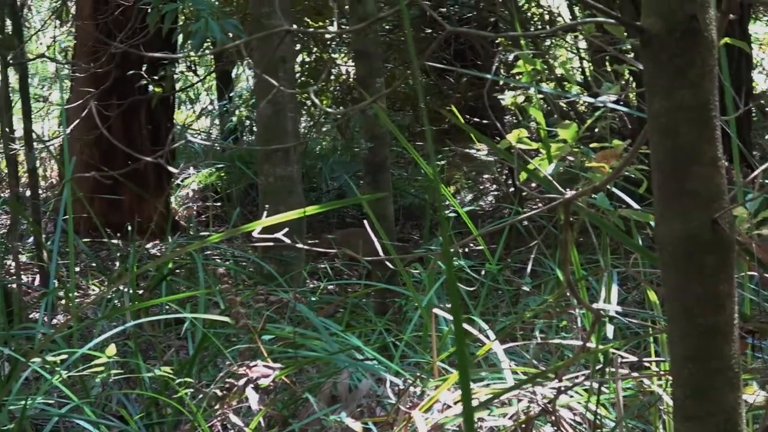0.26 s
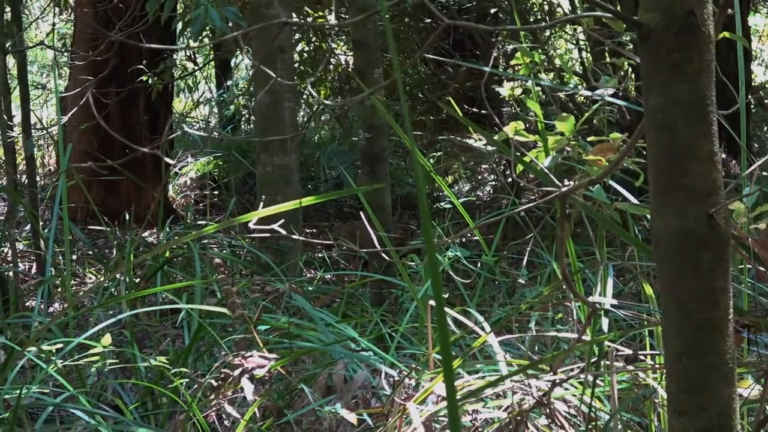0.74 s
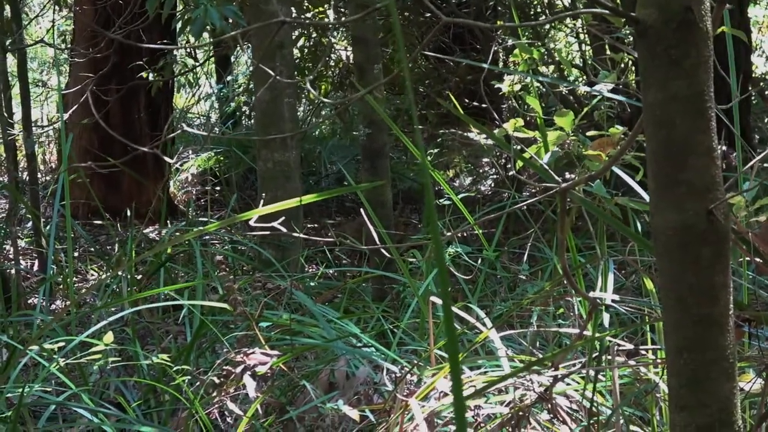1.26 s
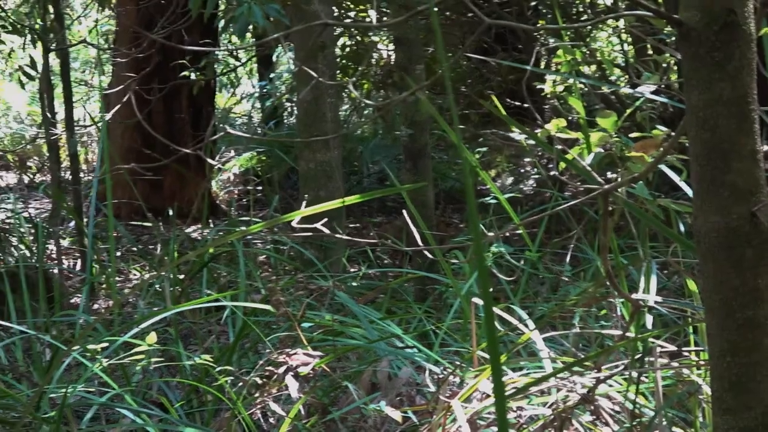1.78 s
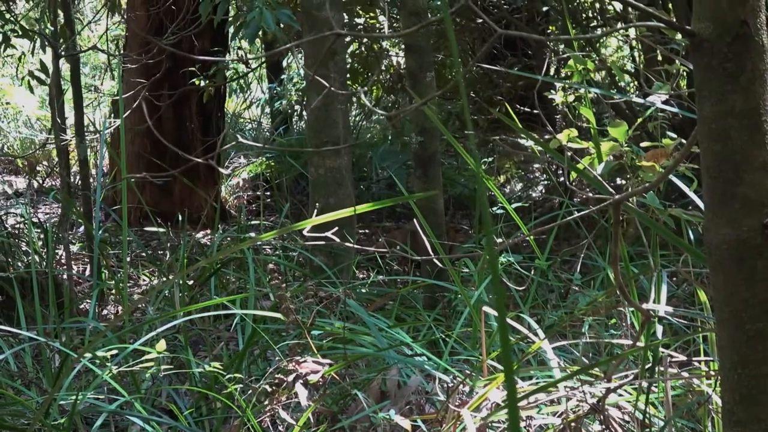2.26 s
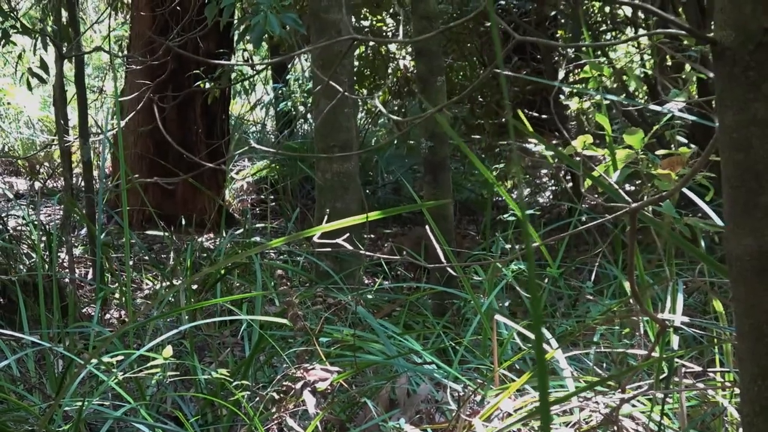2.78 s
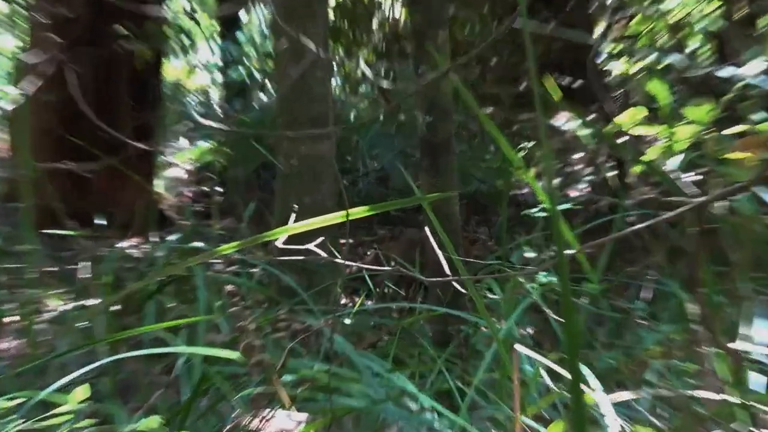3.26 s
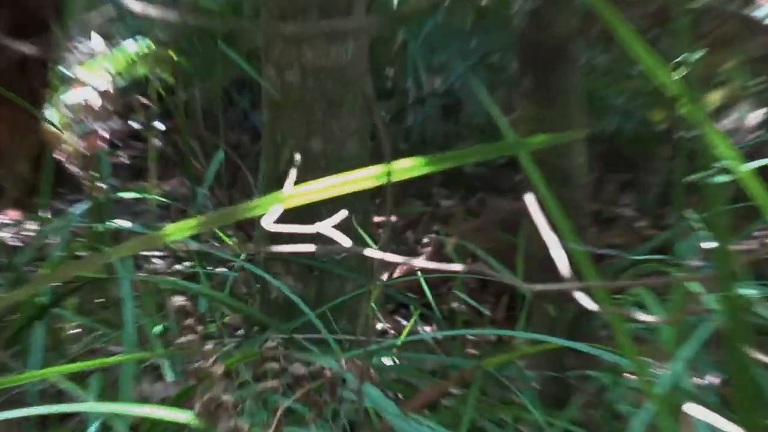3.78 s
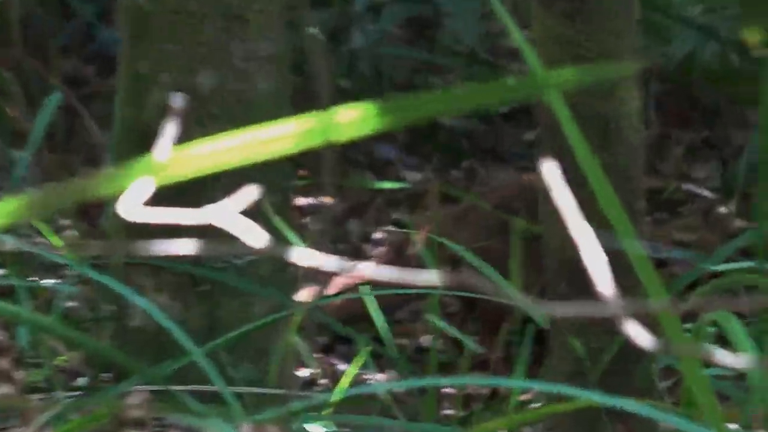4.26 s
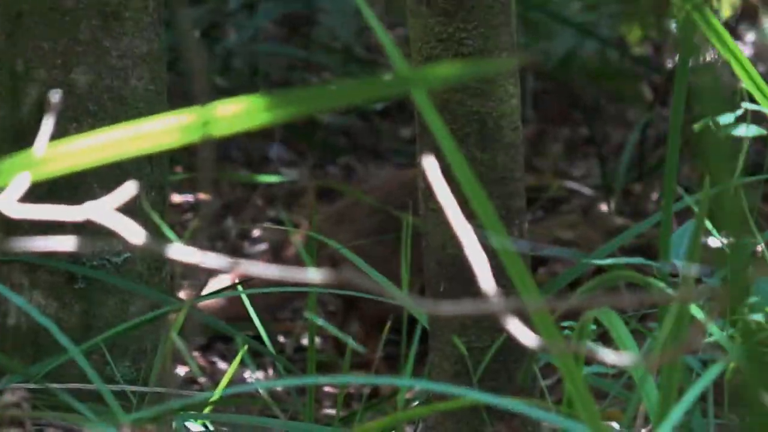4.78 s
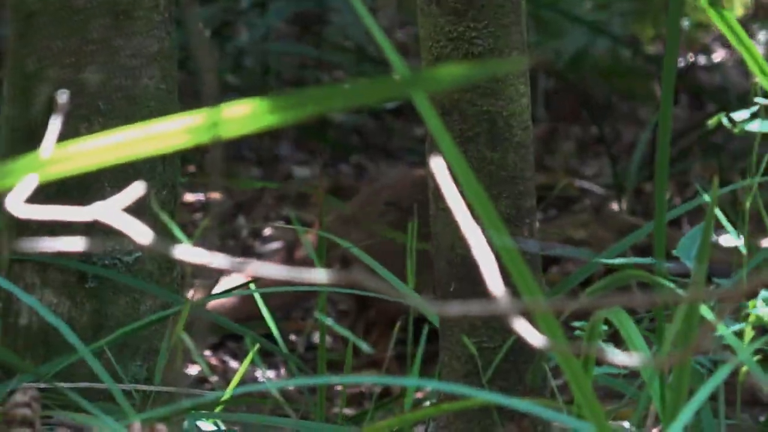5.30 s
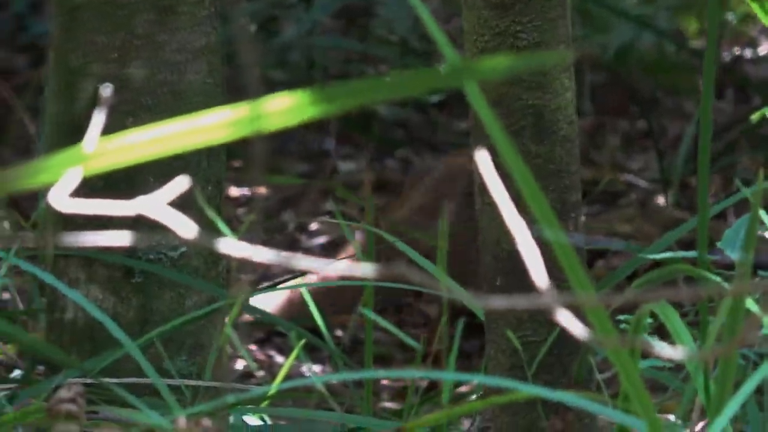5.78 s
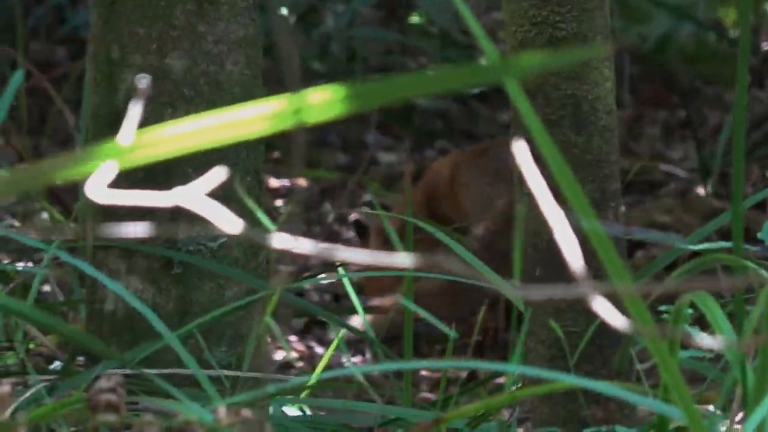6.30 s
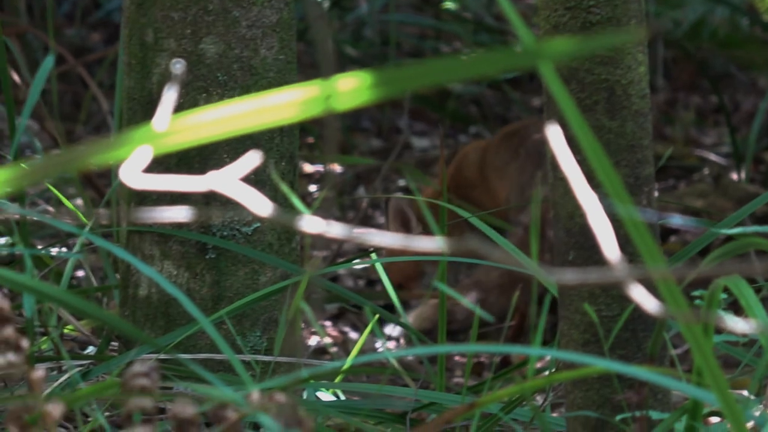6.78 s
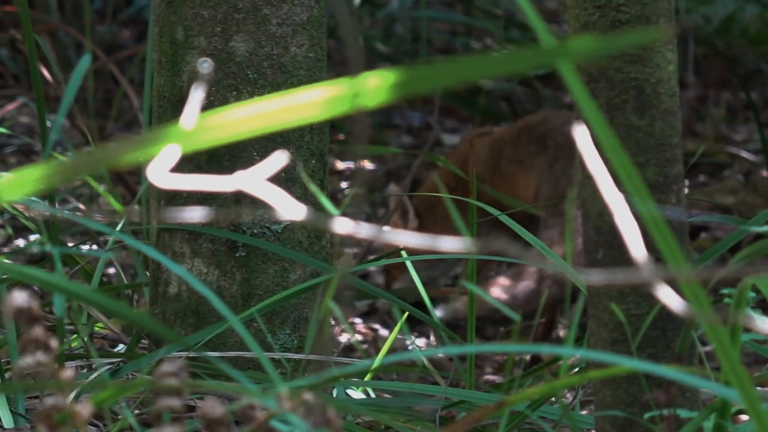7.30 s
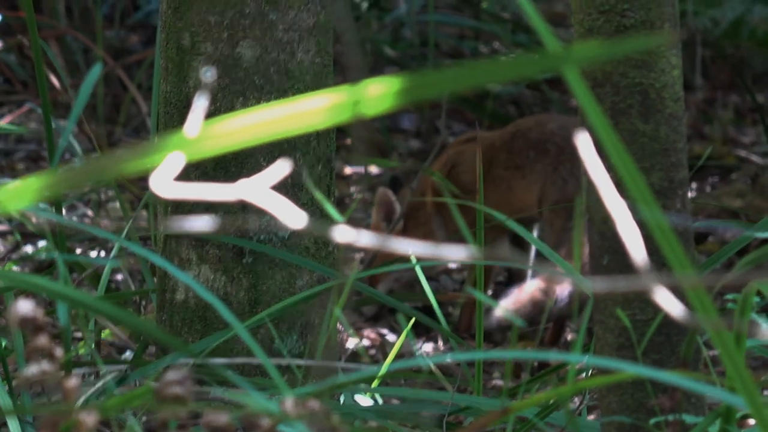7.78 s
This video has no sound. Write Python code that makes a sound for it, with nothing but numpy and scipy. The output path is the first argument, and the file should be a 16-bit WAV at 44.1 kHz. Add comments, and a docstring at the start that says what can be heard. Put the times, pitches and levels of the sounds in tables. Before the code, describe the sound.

Outdoors in dense woodland, a bird close on the right sings piercing, pure pips that grow louder, drops into a quick falling whistle and snaps upward in a whip-like crack. Distant birds ring and chatter in the gap, then the whole song returns. Soft leaf rustle, faint throbbing insects and a low hum lie beneath. Wide stereo pickup, with echoes scattering among the trunks.

```python
"""Whipbird in dense bush

A whipbird close by on the right sings twice: a swelling row of pips, a falling whistle, a rising crack.
Its notes are near-sine tones with faint overtones; sums of noise tails scatter them as trunks and leaves do.
Far birds ring, chatter and call hoarsely and faint high insect bands glide, from the same tone and scatter.
A low hum, drones, a throbbing high insect, rustling leaves, a twig and a faint rumble are all shaped noise."""
import sys
import numpy as np
from scipy import signal
from scipy.fft import rfft, irfft, next_fast_len
from scipy.io import wavfile
from scipy.ndimage import uniform_filter1d

SR = 44100
rng = np.random.default_rng(int(sys.argv[2]) if len(sys.argv) > 2 else 0)


def wav_record(signal):
    """Record a signal, one row per channel, as 16-bit PCM in the file named by sys.argv[1]."""
    frames = np.transpose(np.atleast_2d(signal))
    bounded = np.clip(frames, -1, 1)
    # unit amplitude maps onto the largest positive 16-bit level
    quanta = np.round(bounded * 32767).astype(np.int16)
    wavfile.write(sys.argv[1], SR, quanta)


def ratio(d):
    """dB to gain"""
    e = np.asarray(d, float) / 20
    return 10 ** e


N = 355005
T = np.arange(N) / SR
SIZE = next_fast_len(N + 2 * SR)
HZ = np.arange(SIZE // 2 + 1) * SR / SIZE + 1e-3  # offset avoids division by zero

# Bush background. Each row: frequency in Hz, level in dB per Hz, left minus right in dB, side share.
AIR_SPECTRUM = [(19.9, -88.5, 5.5, .05), (44.26, -76.5, 0, 0.0597), (113.5, -82.5, -1.5, .2),
                (182, -87.5, -1.5, .35), (400, -85.5, 5, 0.24), (1060, -88, 5.5, 0.14),
                (1490, -99, -7, 0.39), (3250, -104, -1, 0.24), (4990, -108.5, -1.5, 0.27),
                (8700, -109, 0, 0.74), (15600, -112, -0.5, 0.55)]
# Low hum and drones. Each row: centre in Hz, width in Hz, mid level in dB, left minus right in dB, side share.
HUM_AND_DRONES = [(72.3, 29, -56.5, -1, 0.062), (657, 298, -56, -0.5, 0.18),
                  (1169.6, 106, -57.5, -15, 0.18)]
# High insect throbs. Each row: middle in seconds, level above the floor's own share in dB.
INSECT_THROBS = [(.15, -73), (.38, -74.5), (.56, -74.5), (.72, -72), (1.0, -72), (1.3, -70.5), (1.62, -71),
                 (1.85, -74), (2.09, -74.5), (2.39, -69.5), (2.61, -71), (2.84, -72), (3.06, -71.5),
                 (3.33, -71.5), (3.54, -70), (3.76, -76.5), (3.91, -69), (4.17, -67), (4.39, -71),
                 (4.62, -71), (4.85, -74), (5.02, -73), (5.22, -72), (5.49, -69), (5.72, -71), (5.97, -70),
                 (6.27, -66.5), (6.6, -66.5), (7.05, -65.5), (7.42, -70), (7.68, -70), (7.9, -70)]
# Breeze in the canopy. Each row: time in seconds, mean level in dB.
BREEZE_LEVELS = [(0, -62), (.5, -69.5), (1.0, -60.5), (2.0, -63.5), (2.6, -67.5), (3.2, -71.5), (4.4, -73),
                 (5.0, -68.5), (6.0, -69), (6.7, -62), (7.4, -65), (8.05, -64)]
# Leaf rustles. Each row: middle in seconds, level in dB ahead of the band gains.
LEAF_RUSTLES = [(.16, -60), (.33, -67), (.41, -55), (.56, -55), (.70, -55), (.94, -60.5), (1.75, -58),
                (1.89, -57.5), (2.0, -59), (2.299, -59), (4.61, -69), (4.955, -65), (5.081, -63.5),
                (5.22, -62.5), (5.489, -59), (5.679, -62), (5.91, -57.5), (6.10, -55), (6.25, -56),
                (6.63, -52.5), (7.178, -57.5)]
# Twig tick. One row: time in seconds, level at its peak in dB.
TWIG_TICK = (7.835, -48.5)
# Far ringing notes. Each row: start in seconds, length in seconds, middle pitch in Hz,
# level in dB ahead of the dry and echo gains, left minus right in dB.
RINGING_NOTES = [(0.0, 0.036, 5535, -50, -11), (0.04, 0.15, 4945, -64.5, 1), (.93, 0.1, 5820, -62.5, -1),
                 (0.922, 0.12, 7300, -67.5, 2), (1.017, 0.064, 4010, -60, -5),
                 (1.393, 0.081, 4980, -44, -2), (1.525, 0.088, 6115, -48, 0),
                 (1.69, 0.047, 5165, -53, -2.5), (1.77, 0.086, 5165, -46, -1),
                 (1.93, 0.17, 6865, -48.5, -1), (2.065, 0.12, 5735, -40, -1.5),
                 (2.272, 0.17, 7165, -48.5, -2.5), (2.38, 0.056, 6195, -41, -1.5),
                 (2.55, 0.19, 3340, -68, -11), (2.565, 0.17, 6484, -43, 0), (4.138, 0.089, 5650, -72, -3.5),
                 (4.237, 0.1, 4875, -73, -4), (4.25, .06, 4660, -74, -3), (4.585, 0.036, 6430, -67, -6.5),
                 (4.597, 0.054, 7590, -68, -2), (4.66, 0.087, 5380, -73, -6), (4.871, 0.04, 4910, -66, -5),
                 (5.339, 0.047, 3400, -68, -7), (6.63, 0.054, 5840, -57.5, -8),
                 (6.682, 0.043, 4000, -58, -9), (7.355, 0.11, 5790, -55.5, -6),
                 (7.49, .24, 5780, -62.5, -4), (7.48, 0.196, 4950, -51.5, -7),
                 (7.621, 0.084, 4445, -77, -8), (7.692, 0.036, 3370, -66, -5), (7.708, 0.16, 6020, -54, -9),
                 (7.69, .08, 5640, -67, -8), (7.825, 0.1135, 5334, -50.5, -11.5)]
# Early flick of the highest ringing notes. One row: pitch in Hz above which notes flick, rise in Hz.
RINGING_FLICK = (6700, 240)
# Low chatter. Each row: start in seconds, length in seconds, first and last pitch in Hz, dry level in dB.
CHATTER_NOTES = [(1.396, 0.07, 2730, 2530, -55), (1.507, 0.024, 2500, 2096, -52.5),
                 (2.304, .04, 3690, 3600, -67.5), (2.795, .028, 3170, 2960, -63),
                 (2.949, .045, 2230, 2170, -68.5), (3.315, 0.035, 3490, 3440, -71),
                 (4.568, .028, 3580, 3560, -66.5), (5.572, 0.015, 1790, 2320, -56),
                 (5.608, 0.017, 2240, 1668, -53), (5.65, 0.02, 2360, 2290, -58),
                 (5.681, 0.015, 2140, 1830, -48.5), (5.702, 0.026, 2404, 2196, -46),
                 (5.731, 0.012, 2664, 2160, -50), (5.806, 0.029, 1527, 2150, -48.5),
                 (5.832, .03, 2540, 2760, -60), (5.965, .02, 2290, 1810, -62),
                 (6.218, 0.036, 2260, 1520, -54.5), (6.34, .014, 2100, 1780, -56),
                 (6.397, 0.038, 1630, 2230, -49), (6.495, 0.028, 2790, 2620, -48),
                 (6.505, 0.022, 2610, 1300, -55.5)]
# Hoarse bird calls and faint gliding high insect bands. Each row: start in seconds, length in seconds,
# first and last pitch in Hz, level in dB ahead of the dry and echo gains.
HOARSE_GLIDES = [(0.374, 0.083, 2950, 2830, -58), (0.49, 0.081, 2985, 2710, -56),
                 (0.594, 0.029, 2730, 2720, -50.5), (0.677, 0.072, 2700, 2650, -53),
                 (0.752, 0.17, 2730, 2550, -59), (1.564, 0.041, 7260, 7950, -45.5),
                 (1.721, 0.078, 3600, 3030, -53.5), (2.476, 0.08, 4620, 4190, -59),
                 (2.563, .04, 2410, 2320, -65), (2.854, .16, 8000, 7860, -66.5),
                 (3.333, .12, 8160, 7980, -68), (3.12, 0.17, 1664, 1626, -69.5),
                 (3.448, 0.3, 7510, 6920, -67.5), (4.825, .1, 1830, 1547, -64.5),
                 (4.874, 0.053, 6500, 6550, -60), (4.915, 0.086, 5710, 6500, -55),
                 (5.103, 0.097, 1550, 1333, -61.5), (5.228, 0.071, 5750, 5770, -71),
                 (6.371, 0.069, 6110, 5830, -55), (7.211, 0.062, 2570, 2470, -63.5),
                 (7.318, .05, 1730, 1685, -62), (7.46, 0.42, 2434, 2297, -64.5),
                 (7.488, 0.14, 5850, 7030, -60.5), (7.93, 0.068, 4500, 4330, -63),
                 (7.934, .1, 6880, 7270, -67), (8.0, 0.0192, 4160, 3400, -63)]
# Flutter of the hoarse glides. One row: share of pitch at 3 kHz, power of pitch by which the Hz of flutter grow.
HOARSE_FLUTTER = (0.049, 1.586)
# Whipbird pips. Each row: start in seconds, length in seconds, middle pitch in Hz, level in dB, fall in Hz.
WHIP_PIPS = [(0.0, 0.068, 3615, -35.5, 100), (0.114, 0.086, 3563, -29.5, 96),
             (0.25, 0.068, 3578, -24.5, 68.5), (0.375, 0.073, 3557, -22.5, 59.5),
             (0.493, 0.066, 3541, -22, 97), (0.615, 0.082, 3568, -17, 21), (0.751, .088, 3534, -18, 182.5),
             (5.393, 0.0445, 3610, -54, 127), (5.565, 0.053, 3557, -43.5, 90),
             (5.705, 0.062, 3582, -40, 57.5), (5.826, 0.07, 3600, -37, 14.5),
             (5.943, 0.075, 3572, -32, -21), (6.06, 0.076, 3575, -24, 9), (6.199, 0.068, 3570, -19.5, 130),
             (6.325, 0.072, 3537, -19.5, 86), (6.455, 0.074, 3492, -20, 60)]
# Whipbird overtones at full voice. Each row: multiple of the pitch, dB in pips,
# then dB in slides and in cracks ahead of the ending's overtone gain.
WHIP_OVERTONES = [(2, -43.5, -39, -40), (3, -40.5, -33.5, -36), (5, -67, -50, -51)]
# Falling whistle. Each row: time after the ending starts in seconds, pitch in Hz, level in dB ahead of its gain.
WHIP_SLIDE = [(0.002, 3602, -44.5), (.011, 3487, -26.5), (.035, 2750, -25), (.055, 2438, -30),
              (.075, 2120, -29.5), (.1, 1800, -39.5), (0.136, 1730, -40.5)]
# Rising crack. Each row: time after the ending starts in seconds, pitch in Hz, level in dB ahead of its gain.
WHIP_CRACK = [(.215, 3400, -44), (.232, 3372, -23.5), (.254, 3660, -19), (.276, 4373, -21.5),
              (.302, 6030, -25), (0.33, 7650, -35)]
# Song endings. Each row: start in seconds, gain in dB, overtone gain in dB.
SONG_ENDINGS = [(0.896, -0.83, -1.5), (6.594, -0.3, 3.5)]


def pan(x, left_minus_right_db):
    """Left and right copies that differ in level and keep the mid level."""
    gains = ratio(np.array([left_minus_right_db, -left_minus_right_db]) / 2)
    return x * (2 * gains / gains.sum(0)).reshape(2, -1)


def band(centre_hz, width_hz):
    """Gain of a resonance passed twice; half gain at the edges of the width."""
    return 1 / (1 + ((HZ - centre_hz ** 2 / HZ) / width_hz) ** 2)


def noise_spectrum(gain, side_share):
    """Two-ear noise spectrum shaped by gain, mid rms 1."""
    mid, side = rfft(rng.standard_normal((2, SIZE)))
    return gain / np.sqrt(np.mean(gain ** 2)) * (mid + np.array([[1], [-1]]) * side_share * side)


def noise(gain, side_share):
    """Two-ear noise shaped by gain, mid rms 1."""
    return irfft(noise_spectrum(gain, side_share), SIZE)[:, :N]


def walk(rate_hz):
    """Random levels held 1 / rate_hz seconds and smoothed twice; spread about 0.75."""
    hold = int(SR / rate_hz)
    steps = np.repeat(rng.standard_normal(N // hold + 1), hold)
    return uniform_filter1d(uniform_filter1d(steps, hold), hold)[:N]


FLUTTER = walk(500)  # pitch unsteadiness shared by every tone


def swells(rows, sigma_s):
    """Sum of Gaussian swells of one width; each row: middle in seconds, level in dB."""
    return sum(ratio(db) * np.exp(-0.5 * ((T - middle_s) / sigma_s) ** 2) for middle_s, db in rows)


def whistle(hz, level, overtones):
    """Near-sine tone, as of a syrinx; its faint overtones grow as the voice is pushed."""
    push = (level / ratio(-19.5)) ** 0.76  # 1 at full voice
    phase = 2 * np.pi * np.cumsum(hz) / SR
    tone = np.sin(phase)
    for multiple, db in overtones:
        audible = multiple * hz < 0.45 * SR
        tone = tone + push * ratio(db) * np.sin(multiple * phase) * audible
    return np.sqrt(2) * level * tone


def note(start_s, length_s, first_hz, last_hz, db, flutter_hz, skew,
         overtones=(), arch_hz=0, onset=0, arch_skew=1):
    """One gliding, fluttering note; a skew above 1 puts its swell late."""
    out, i = np.zeros(N), int(start_s * SR)
    u = np.linspace(0, 1, int(length_s * SR))[:N - i]
    end = i + len(u)
    arch = arch_hz * np.sin(np.pi * u ** arch_skew) ** 2
    hz = first_hz + (last_hz - first_hz) * u + flutter_hz * FLUTTER[i:end] + arch
    switch_on = onset * (1 - u) * np.clip(u * length_s / 0.003, 0, 1)
    swell = np.sin(np.pi * u ** skew) + switch_on
    out[i:end] = whistle(hz, ratio(db) * swell, overtones)
    return out


def scatter(x, tails, side_share):
    """Echoes as noise tails; each row: level in dB, build-up in seconds, t60 in seconds, tilt in dB per octave."""
    t, response = np.arange(2 * SR) / SR, 0
    for db, build_s, t60_s, tilt_db in tails:
        tail = noise(np.ones(len(HZ)), side_share)[:, :len(t)]
        tail = tail * np.clip(t / build_s, 0, 1) * ratio(-60 * t / t60_s)
        tail = tail * ratio(1.97 * walk(120)[:len(t)])  # single trunks stand out of the tail
        energy = np.sum(tail.mean(0) ** 2)
        tilt = ratio(db + tilt_db * np.log2(HZ.clip(800) / 3500))
        response = response + tilt * rfft(tail, SIZE) / np.sqrt(energy)
    return irfft(rfft(x, SIZE) * response, SIZE)[:, :N]


def air():
    """Broad background noise with a rumbling bass; balance and side share vary with frequency."""
    hz, *columns = np.transpose(AIR_SPECTRUM)
    db, left_minus_right_db, side_share = (np.interp(np.log(HZ), np.log(hz), c) for c in columns)
    gain = ratio(db)
    rms = np.sqrt(np.mean(gain ** 2) * SR / 2)
    return irfft(pan(noise_spectrum(gain, side_share), left_minus_right_db), SIZE)[:, :N] * rms


def hum_and_drones():
    """Steady low resonant bands of noise whose levels waver a little."""
    out = 0
    for hz, width_hz, db, left_minus_right_db, side_share in HUM_AND_DRONES:
        level = ratio(db + 1.2 * walk(12) + 1.0 * walk(1.7))
        out = out + pan(noise(band(hz, width_hz), side_share) * level, left_minus_right_db)
    return out


def insect_throbs():
    """High hiss that flickers and throbs about four times a second over a floor."""
    floor_db, sigma_s = -77, 0.05
    throb = ratio(floor_db) + swells(INSECT_THROBS, sigma_s)
    return noise(band(12570, 2583), 0.27) * throb * ratio(1.547 * walk(150))


def breeze():
    """Soft wash of leaf noise whose level follows the breeze."""
    db = np.interp(T, *np.transpose(BREEZE_LEVELS)) + 1.2 * walk(14) + 1.5 * walk(3.5)
    return pan(noise(band(5060, 4485), 0.37) * ratio(db), -1.18)


def rustles():
    """Leaf noise in swells; each band of leaves flickers on its own."""
    leaves = 0
    for hz, gain_db in [(4300, -17.5), (5700, -5.5), (7400, -5.5), (9500, -33.5)]:
        leaves = leaves + ratio(gain_db + 2.0 * walk(45)) * noise(band(hz, hz / 3), 0.307)
    return pan(leaves * swells(LEAF_RUSTLES, 0.044), -1.18)


def twig():
    """One tick: two resonant noise bands that rise and die exponentially."""
    tick_s, db = TWIG_TICK
    envelope = np.exp(-np.abs(T - tick_s) / 0.0024)
    return ratio(db) * envelope * noise(band(1580, 500) + band(4200, 400), 0.2)


def hoarse_glides():
    """Hoarse bird calls and faint high insect bands: tones roughened by pitch flutter, mostly echoes."""
    share, power = HOARSE_FLUTTER
    glides = 0
    for row in HOARSE_GLIDES:
        flutter_hz = share * 3000 * (row[2] / 3000) ** power
        glides = glides + note(*row, flutter_hz, 0.69)
    glides = pan(glides, -2.9)
    return 0.38 * glides + scatter(glides, [(-1.566, 0.004, 0.36, 0.00027)], 0.38)


def ringing_birds():
    """Soft steady notes, dry and scattered; only the highest flick up early and settle back."""
    flick_above_hz, rise_hz = RINGING_FLICK
    notes = 0
    for start_s, length_s, hz, db, left_minus_right_db in RINGING_NOTES:
        flick_hz = rise_hz * (hz > flick_above_hz)
        ring = note(start_s, length_s, hz, hz, db, 28.0, 0.85, arch_hz=flick_hz, arch_skew=0.4)
        notes = notes + pan(ring, left_minus_right_db)
    return 0.82 * notes + scatter(notes, [(-8.5, 0.0035, 0.043, -0.33), (1.5, 0.023, 0.79, 0.0014)], 0.379)


def chattering_bird():
    """Quick low gliding notes of another bird, with fainter echoes."""
    notes = pan(sum(note(*row, 12.0, 0.88) for row in CHATTER_NOTES), -5.0)
    return notes + scatter(notes, [(-10.5, 0.002, 0.14, 0.0), (-9.5, 0.023, 1.0, -1.1)], 0.3)


def whip_pips(multiples, overtone_db):
    """Pips that switch on at a share of full level, swell late and sag in pitch midway, with a little air noise."""
    overtones = list(zip(multiples, overtone_db))
    pips = sum(note(start_s, length_s, hz + fall_hz / 2, hz - fall_hz / 2, db, 15.0, 2.13,
                    overtones, arch_hz=-15.5, onset=0.1114)
               for start_s, length_s, hz, db, fall_hz in WHIP_PIPS)
    puff = np.sqrt(uniform_filter1d(pips ** 2, size=200).clip(0))
    return pips + ratio(-38) * puff * noise(band(3300, 600), 0)[0]


def whip_figure(curve, start_s, gain_db, overtones):
    """A slide or crack: one syrinx tone along its pitch and level curve."""
    t = T - start_s
    curve_s, curve_hz, curve_db = np.transpose(curve)
    edge = np.clip(np.minimum(t - curve_s[0], curve_s[-1] - t) / 0.0019, 0, 1)
    hz = uniform_filter1d(np.interp(t, curve_s, curve_hz), size=600) + 15 * FLUTTER
    return whistle(hz, edge * ratio(np.interp(t, curve_s, curve_db) + gain_db), overtones)


def whipbird():
    """Pips, slides and cracks to the right, each note scattered by the bush."""
    multiples, pip_db, slide_db, crack_db = np.transpose(WHIP_OVERTONES)
    song = whip_pips(multiples, pip_db)
    for start_s, gain_db, overtone_gain_db in SONG_ENDINGS:
        for curve, figure_db in ((WHIP_SLIDE, slide_db), (WHIP_CRACK, crack_db)):
            overtones = zip(multiples, figure_db + overtone_gain_db)
            song = song + whip_figure(curve, start_s, gain_db, overtones)
    tails = [(-6.5, 0.00183, 0.092, -5.0),  # nearby leaves smear the note at once
             (-9.0, 0.017, 0.28, 7.0),  # trunks answer later
             (-11.0, 0.037, 0.98, 0.0)]  # the far bush last
    return pan(song, -5.0) + pan(scatter(song, tails, 0.16), -4.0)


def scene():
    """Air, hum, drones, insects, leaves, far birds and whipbird together."""
    background = air() + hum_and_drones() + insect_throbs()
    leaves = breeze() + rustles() + twig()
    distance = hoarse_glides() + ringing_birds() + chattering_bird()
    return background + leaves + distance + whipbird()


def top_cut(x):
    """Nothing passes above the cut-off."""
    return signal.sosfilt(signal.butter(12, 15710, fs=SR, output="sos"), x)


def record(dry):
    """Delivers the finished mix."""
    return top_cut(dry)


dry = scene()
out = record(dry)
wav_record(out)
```